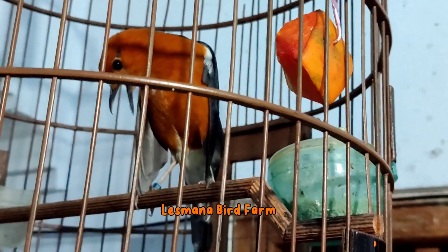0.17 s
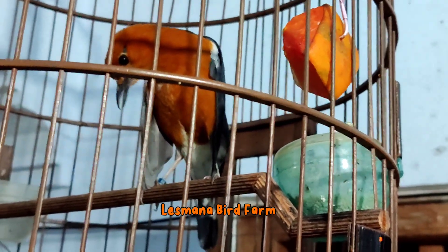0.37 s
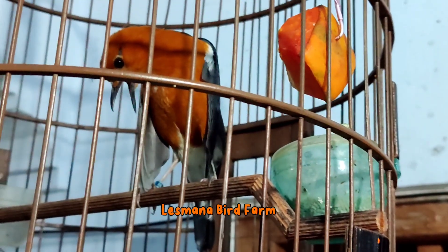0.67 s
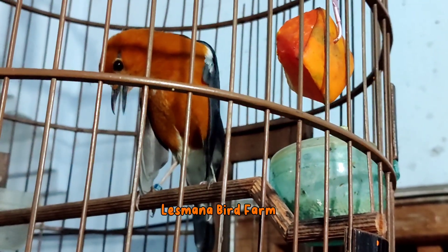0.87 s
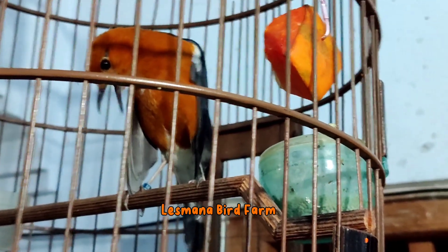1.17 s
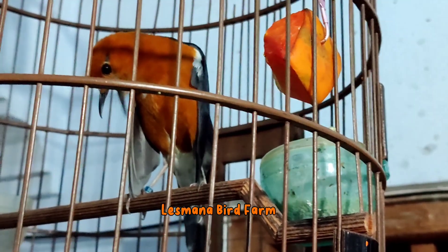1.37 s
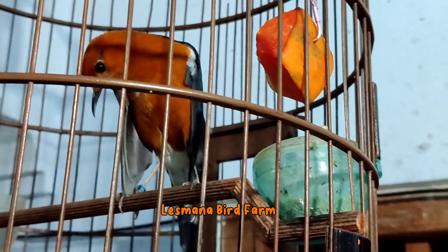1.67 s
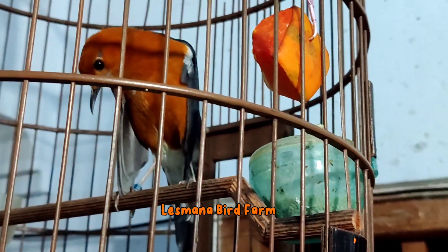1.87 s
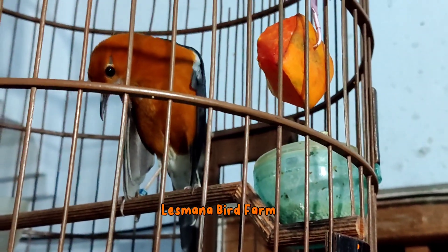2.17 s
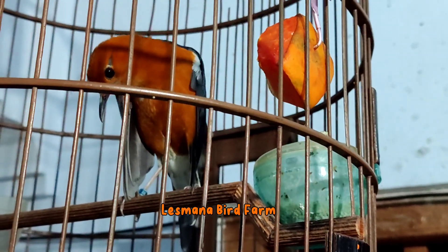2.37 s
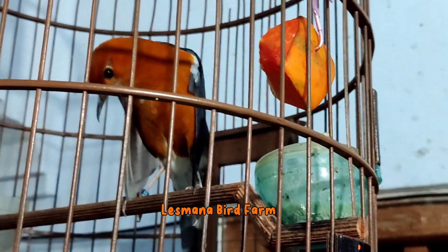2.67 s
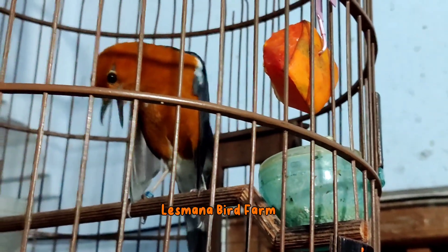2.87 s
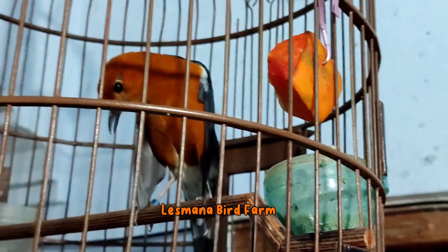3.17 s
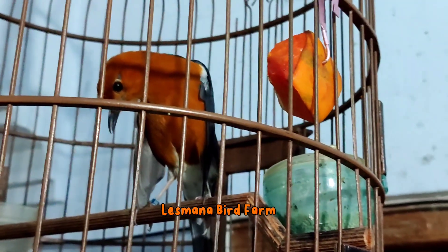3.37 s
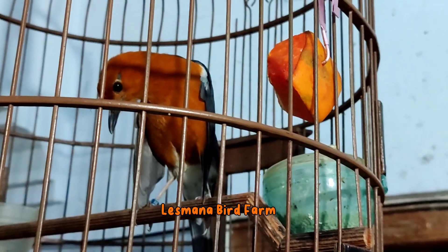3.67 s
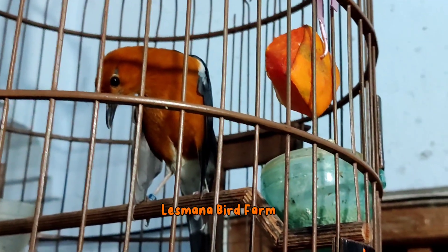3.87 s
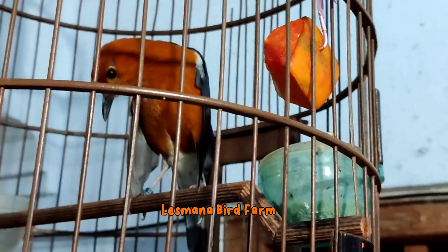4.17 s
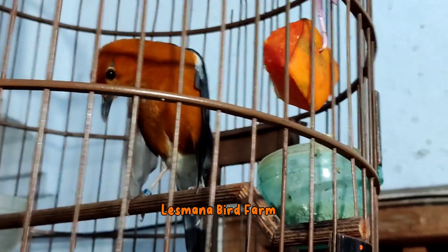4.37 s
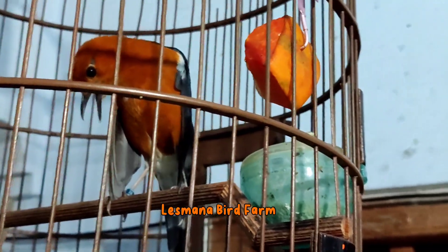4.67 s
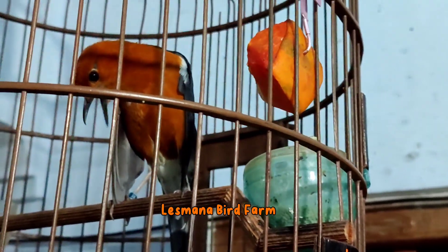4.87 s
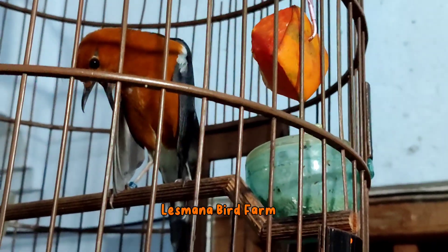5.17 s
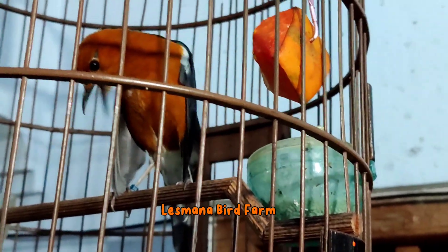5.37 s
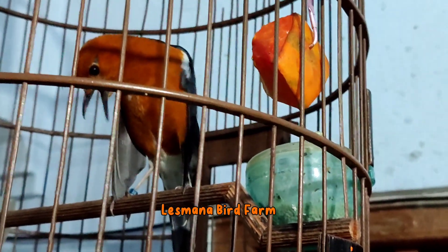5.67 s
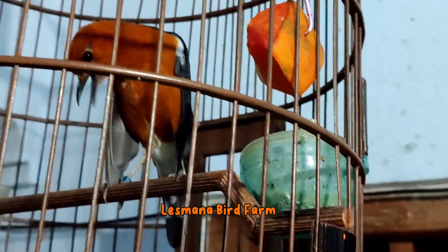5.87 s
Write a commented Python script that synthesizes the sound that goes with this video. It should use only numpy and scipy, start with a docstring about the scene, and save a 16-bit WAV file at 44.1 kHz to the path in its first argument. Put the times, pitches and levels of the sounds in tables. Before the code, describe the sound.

Very close caged songbird in a small hard-walled room, mostly on the right. Hoarse descending slurs lead to peeps and chirps that rise and plunge, then a fast warble, a very high sagging whistle and a swoop diving over an octave and back. Snappy chirps and a run of five ticks end the phrase. Quiet hum and air fill the gap before soft warbling, a nasal note, raspy slurs and bright peeps. Low overload thumps mark loud notes.

```python
"""A fading high ring over soft room air and a faint motor hum, then a caged thrush close to the microphones.
It sings raspy falling slurs, peeps, arched chirps, warbles, whistles, a swoop, sharp ticks and a nasal note.
Its syrinx is a gliding tone with harmonics, of which the throat favours one; hiss and trembling make the rasp.
The cage and the walls of the small room echo it as decaying noise; the right microphone thumps on loud notes."""
import sys
import numpy as np
from scipy import signal
from scipy.fft import rfft, irfft
from scipy.io import wavfile
from scipy.ndimage import uniform_filter1d

SR = 44100
rng = np.random.default_rng(int(sys.argv[2]) if len(sys.argv) > 2 else 0)


def log_audio(samples):
    """Write samples as a 16-bit WAV file to the path given in sys.argv[1]."""
    # one column per channel
    frames = np.atleast_2d(samples).T
    # limit to full scale, then quantise
    limited = np.clip(frames, -1, 1)
    pcm = np.round(limited * 32767).astype(np.int16)
    wavfile.write(sys.argv[1], SR, pcm)


N = 265702
TIME = np.arange(N) / SR


def from_db(db):
    """Amplitude factor of a level in dB."""
    return 10 ** (np.asarray(db) / 20)


def rms_one(x):
    """Scale a signal to rms 1."""
    return x / np.sqrt(np.mean(x ** 2) + 1e-20)


def at_hz(points, hz):
    """Read a curve of (Hz, value) points on a log-frequency axis."""
    points = np.array(points)
    return np.interp(np.log(np.maximum(hz, 1)), np.log(points[:, 0]), points[:, 1])


def band(x, low_hz, high_hz):
    """Causal band-pass."""
    edges_hz = [low_hz, min(high_hz, .45 * SR)]
    return signal.sosfilt(signal.butter(2, edges_hz, "band", fs=SR, output="sos"), x)


def resonate(x, hz, width_hz):
    """One resonance with gain 1 on top."""
    r = np.exp(-np.pi * width_hz / SR)
    zeros = np.array([1, 0, -1]) * (1 - r * r) / 2
    poles = [1, -2 * r * np.cos(2 * np.pi * hz / SR), r * r]
    return signal.lfilter(zeros, poles, x)


def panned(pan_db):
    """Left and right gains of mean power 1; pan_db is left minus right, so negative leans right."""
    gains = from_db(np.array([pan_db, -pan_db]) / 2)
    return gains / np.sqrt(np.mean(gains ** 2, axis=0))


def background(air_db=0, hum_db=-1, hum_width_hz=3):
    """Soft room noise, shaped in spectrum and stereo width, and the wavering lines of a motor."""
    # spectrum of the room air: hz, level_db (relative, per Hz)
    air_spectrum = [(20, -72), (35, -77), (80, -84.5), (170, -91), (270, -87), (450, -93), (900, -97),
                    (1800, -101), (3000, -105), (5000, -109), (7200, -108), (8500, -118), (13000, -115),
                    (16000, -117)]
    # lines of the motor: hz, level_db (relative to hum_db)
    hum_lines = [(168, -75.5), (247.6, -61), (285.3, -66.5), (323.0, -68), (355.3, -69.5)]
    # balance of the air: hz, left_minus_right_db
    air_balance = [(60, -0.5), (110, 4), (200, -1.5), (380, -5), (700, 1), (1290, -2), (2380, -1.5),
                   (4400, -6.0), (8120, -10), (15000, -8.5)]
    # correlation of the two channels: hz, likeness (values below 0 count as 0)
    air_likeness = [(60, 0.12), (180, 0.18), (550, 0.93), (1650, -0.1), (4970, -0.84), (15000, 0.01)]
    hz = np.arange(N // 2 + 1) * SR / N
    mid, side = rfft(rng.standard_normal((2, N)))
    alike = np.clip(at_hz(air_likeness, hz), 0, 1)
    pair = np.sqrt(1 + alike) * mid + np.sqrt(1 - alike) * side * [[1], [-1]]
    air = irfft(pair * from_db(at_hz(air_spectrum, hz)) * panned(at_hz(air_balance, hz)), N)
    hum = 0
    for line_hz, db in hum_lines:
        line = irfft(side * np.exp(-((hz - line_hz) / hum_width_hz) ** 2), N)
        hum = hum + from_db(db) * rms_one(line)
    return from_db(air_db) * np.sqrt(SR / 2) * air + from_db(hum_db) * hum


def lingering_note(pitch_hz=4950, width_hz=220, level_db=-34, overtones_db=-9, t60=0.52):
    """At first the room still rings with an earlier peep: narrow and broad noise dying away."""
    narrow = resonate(rng.standard_normal((2, N)), pitch_hz, width_hz)
    tone = rms_one(resonate(narrow, pitch_hz, 2 * width_hz))
    overtones = from_db(overtones_db) * rms_one(band(rng.standard_normal((2, N)), 4000, 11000))
    return (tone + overtones) * from_db(level_db - np.minimum(60 * TIME / t60, 200))


def span(start_s, length_s):
    """Sample times of one note, and its progress from 0 to 1."""
    t = np.arange(int(start_s * SR), int((start_s + length_s) * SR) + 2) / SR
    return t, np.linspace(0, 1, len(t))


def gesture(rows):
    """Sample times of a gesture and its columns, joined by lines with rounded corners."""
    s, *columns = np.transpose(rows)
    s = np.maximum.accumulate(s)
    t = np.arange(int(s[0] * SR), int(s[-1] * SR) + 2) / SR
    rounding = max(len(t) // 20, 1)
    return [t] + [uniform_filter1d(np.interp(t, s, c), rounding, mode="nearest") for c in columns]


def gate(t, attack_s, release_s):
    """The air valve opens and shuts."""
    return np.clip((t - t[0]) / attack_s, 0, 1) * np.clip((t[-1] - t) / release_s, 0, 1)


def swell(progress, crest, rise_db, fall_db):
    """Effort rounds up to a crest and sinks again; dB relative to the crest."""
    crest = np.clip(crest, .02, .98)
    before = rise_db * (1 - progress / crest) ** 2
    after = fall_db * ((progress - crest) / (1 - crest)) ** 2
    return -np.where(progress < crest, before, after)


def ending(t, length_s):
    """Grows ever faster from 0 to 1 over the last moments of a note; reversed, it shapes the attack."""
    return np.clip(1 - (t[-1] - t) / length_s, 0, 1) ** 2


def add(out, t, sound, pan_db):
    """Place a sound between the two channels."""
    start = round(t[0] * SR)
    out[:, start:start + len(t)] += (panned(pan_db).reshape(2, -1) * sound)[:, :max(N - start, 0)]


def syrinx(pitch, throat_hz, overtones_db, doubling, throat_octaves=0.32, rolloff_db=28, rolloff_ratio=2.68):
    """Harmonics of a gliding pitch: those near the throat resonance dominate, the others leak by the beak."""
    # how well the open beak radiates overtones: hz, level_db (relative)
    beak = [(1500, -25), (2200, -2.5), (2800, -3), (3400, 4), (4500, -5), (5700, 4.5), (7000, 4),
            (8900, -7), (10200, -3), (11500, 2.5), (13200, 4.5), (14500, -5), (16000, -7.5)]
    phase, out = 2 * np.pi * np.cumsum(pitch) / SR, 0
    for halves in range(1, 15):  # odd counts are the half-pitch lines of a doubled period
        hz = pitch * halves / 2
        octaves = np.log2(hz / throat_hz)
        rolloff = rolloff_db * np.maximum(octaves - np.log2(rolloff_ratio), 0)
        leak = from_db(overtones_db + at_hz(beak, hz) - rolloff)
        favoured = np.exp(-(octaves / throat_octaves) ** 2)
        gain = leak * doubling if halves % 2 else leak + (1 - leak) * favoured
        below_limit = np.clip((.45 * SR - hz) / 1000, 0, 1)  # keeps clear of aliasing
        out = out + gain * below_limit * np.sin(phase * halves / 2)
    return out


def flutter(t, rate_hz, width_hz):
    """Irregular trembling around one rate, with nothing much faster; rms 1 before trimming to the note."""
    steep = signal.butter(6, rate_hz + width_hz / 2, fs=SR, output="sos")
    trembling = resonate(rng.standard_normal(N // 10), rate_hz, width_hz)
    return rms_one(signal.sosfilt(steep, trembling))[-len(t):]


def turbulence(t, low_hz=5800, high_hz=15000):
    """Hiss of the air jet, band-passed twice for steep edges; rms 1 before trimming to the note."""
    once = band(rng.standard_normal(N // 10), low_hz, high_hz)
    return rms_one(band(once, low_hz, high_hz))[-len(t):]


def sing(t, pitch, level_db, overtones_db, pan_db, rasp=0, throat_ratio=1, doubling=0, rasp_depth=.04,
         rasp_throb=0.47, throb_above_hz=2000, hiss_db=-16, leak_db=-44, jitter=0.0047):
    """One stereo note with a little leaking air; rasp trembles the membranes in pitch and strength, and hisses."""
    tremble = rasp * flutter(t, rate_hz=450, width_hz=736)
    # jitter is the unsteadiness as a share of pitch
    bend = 1 + rasp_depth * tremble + jitter * flutter(t, rate_hz=120, width_hz=270)
    tone = syrinx(pitch * bend, pitch * throat_ratio, overtones_db, doubling)
    throb = rasp_throb * tremble * band(tone, throb_above_hz, 18000)
    hiss = from_db(hiss_db) * rasp * turbulence(t)
    leaking_air = from_db(leak_db) * turbulence(t, low_hz=1900, high_hz=11900)
    loudness = from_db(level_db) * gate(t, attack_s=0.0019, release_s=0.0014)
    out = np.zeros((2, N))
    add(out, t, (tone + throb + hiss + leaking_air) * loudness, pan_db)
    return out


def slurs(onset_db=17, release_db=10, end_rasp=.15, end_bright_db=3, rasp_power=0.85):
    """The pitch settles from above and droops, while the note grows louder and raspier; the octave leads."""
    # raspy slurs: start_s, length_s, first_hz, held_hz, settle_s, droop_hz, level_db (before the fades),
    # crescendo_db, rasp (0-1, before end_rasp), doubled_from_s, doubled_until_s
    slur_rows = [ (0.168, 0.22, 4093, 3193, 0.07, 496, -14, 9, 0.48, 0.2, 0.25),
                 (.567, 0.22, 4160, 3235, 0.064, 427, -16.5, 2.5, 0.6, 0.59, 0.64),
                 (5.115, 0.19, 3934, 3302, .035, 273.5, -10.5, 9.5, 0.82, 5.121, 5.147),
                 (5.463, 0.18, 4160, 3360, 0.026, 259, -10.5, 9, 0.53, 5.473, 5.44), ]
    attack_s, release_s, droop_s = 0.013, 0.033, .055
    overtones_db, throat_ratio, pan_db = -14, 2.04, -9
    # half-pitch lines relative to the overtones: while the syrinx doubles its period, and afterwards
    doubled_db, undoubled_db = 2, -15.5
    for (start, length, first_hz, held_hz, settle_s, droop_hz, db, crescendo_db, rasp,
         doubled_from, doubled_until) in slur_rows:
        t, progress = span(start, length)
        droop = ending(t, droop_s)
        settling = (first_hz - held_hz) * np.exp(-(t - t[0]) / settle_s)
        pitch = held_hz + settling - droop_hz * droop
        level_db = db - crescendo_db * (1 - progress)
        level_db = level_db - onset_db * ending(t, attack_s)[::-1] - release_db * ending(t, release_s)
        half_lines = from_db(np.where(t < doubled_until, doubled_db, undoubled_db))
        doubling = uniform_filter1d((t > doubled_from) * half_lines, size=200)
        yield sing(t, pitch, level_db, overtones_db + end_bright_db * droop, pan_db,
                   rasp * progress ** rasp_power + end_rasp * droop, throat_ratio, doubling,
                   rasp_depth=0.026, rasp_throb=0.61, throb_above_hz=5670, hiss_db=-16.0, leak_db=-49.5)


def echo_tail(t60_table, delay_s):
    """Dense stereo reflections that fade in up to delay_s and die away band by band, each scaled to unit energy."""
    t, out = TIME[:N // 10], 0
    white = rfft(rng.standard_normal((2, len(t))))
    hz = np.arange(white.shape[1]) * SR / len(t)
    edges = np.geomspace(1000, 18000, 13)
    for low, high in zip(edges, edges[1:]):
        t60 = at_hz(t60_table, np.sqrt(low * high))
        decay = from_db(-60 * t / t60) * np.clip(2 * t / delay_s - 1, 0, 1)
        noise = irfft(white * ((hz >= low) & (hz < high)), len(t))
        out = out + noise * decay / np.linalg.norm(decay)
    return out


def surroundings(song, cage_db=-9, cage_t60=0.047, room_db=-6, room_pan_db=-5):
    """The cage scatters the song within milliseconds, the walls a little later and for longer."""
    # reverberation of the room: hz, t60_s
    room_t60 = [(2000, 0.63), (4000, 0.39), (7000, 0.38), (11000, 0.24), (16000, .22)]
    cage = from_db(cage_db) * echo_tail([(2000, cage_t60), (16000, cage_t60)], delay_s=0.0085)
    room = from_db(room_db) * echo_tail(room_t60, delay_s=0.012) * panned(room_pan_db)[:, None]
    from_cage = signal.fftconvolve(song, cage, axes=1)
    from_walls = signal.fftconvolve(song.mean(0)[None], room, axes=1)
    return (from_cage + from_walls)[:, :N]


def peeps(droop_power=2.4, pan_db=-9):
    """Clear notes that nearly hold their pitch, then droop."""
    # clear peeps: start_s, length_s, pitch_hz, droop_hz, level_db (at the crest), overtones_db,
    # half_pitch_lines_db (relative to the overtones)
    peep_rows = [ (0.868, 0.037, 4900, 292, -26.5, -7, -26), (1.025, 0.053, 4680, 308, -15, -11, -24.5),
                 (5.787, 0.045, 5038, 454, -10.5, -13, -39), (5.909, 0.052, 4640, 303, -10.5, -15.5, -25.5),
                 ]
    for start, length, hz, droop_hz, db, overtones_db, doubling_db in peep_rows:
        t, progress = span(start, length)
        pitch = hz - droop_hz * progress ** droop_power
        level_db = db + swell(progress, crest=0.32, rise_db=9, fall_db=5)
        yield sing(t, pitch, level_db, overtones_db, pan_db, doubling=from_db(doubling_db))


def arches(early_rasp_share=0.32, doubling_db=-9, leak_db=-40, rasp_leak_db=24, fade_db=14, fall_power=1.15):
    """The pitch climbs or holds to a top as the note swells, then plunges, fades, roughens and doubles its period."""
    # arched chirps: start_s, rise_s, fall_s, first_hz, top_hz, last_hz, roundness of the rise (power),
    # level_db (at the top), fade_in_db, overtones_db, final_rasp (0-1), left_minus_right_db
    arch_rows = [ (1.156, .043, 0.03, 4290, 4330, 2920, 1.7, -13.5, 7.5, -8, 0.27, -4),
                 (1.278, 0.047, 0.043, 3600, 4170, 2700, 2.7, -13.5, 17, -7.5, 0.42, -6),
                 (1.423, .048, 0.034, 3686, 4127, 2556, 3.2, -13, 5.5, -10, 0.08, -4),
                 (1.576, 0.033, 0.01, 6300, 7090, 4660, 1.02, -7, 7.5, -15, 0.72, -10),
                 (2.546, 0.01, .020, 7070, 7065, 4204, 1.8, -5.5, 22, -8.5, 1, -12.5),
                 (2.654, 0.016, 0.026, 4490, 7140, 3770, 2, -7, 11, -9, 1, -11),
                 (2.794, .003, 0.0079, 4970, 6000, 5070, 2.5, -7, 9, -16.5, 0.8, -13.5), ]
    for (start, rise_s, fall_s, first_hz, top_hz, last_hz, roundness, db, fade_in_db,
         overtones_db, rasp, pan_db) in arch_rows:
        t, progress = span(start, rise_s + fall_s)
        to_climb = np.clip(1 - (t - start) / rise_s, 0, 1)
        fallen = np.clip((t - start - rise_s) / fall_s, 0, 1)
        climb = (top_hz - first_hz) * to_climb ** roundness
        plunge = (top_hz - last_hz) * fallen ** fall_power
        level_db = db - fade_in_db * to_climb ** 2 - fade_db * fallen
        rasp_now = rasp * np.maximum(early_rasp_share * progress, np.sqrt(fallen))
        yield sing(t, top_hz - climb - plunge, level_db, overtones_db, pan_db, rasp_now,
                   doubling=from_db(doubling_db) * rasp_now, leak_db=leak_db + rasp_leak_db * rasp_now)


def warbles(doubling_db=-24):
    """The pitch swings quickly about a slow glide."""
    # warbles: start_s, length_s, first_hz, last_hz (centre of the swing), rate_hz, depth (share of pitch),
    # level_db (at the crest), overtones_db, rasp (0-1), left_minus_right_db
    warble_rows = [ (1.719, 0.1, 5704, 6328, 74, .065, -9, -17.5, 0.1, -9),
                   (4.58, 0.12, 4250, 4187, 51, 0.058, -21, -10.5, 0.35, -8),
                   (4.751, .085, 3570, 3517, 48, 0.054, -24, -13.5, 0.17, -3.5), ]
    for start, length, first_hz, last_hz, rate, depth, db, overtones_db, rasp, pan_db in warble_rows:
        t, progress = span(start, length)
        glide = first_hz + (last_hz - first_hz) * progress
        pitch = glide * (1 + depth * np.cos(2 * np.pi * rate * (t - t[0])))
        level_db = db + swell(progress, crest=0.15, rise_db=12.5, fall_db=7)
        yield sing(t, pitch, level_db, overtones_db, pan_db, rasp, doubling=from_db(doubling_db))


def whistles(onset_rasp=.35, leak_db=-50, onset_leak_db=32, settle_s=0.013):
    """The pitch drops fast onto its line, hoarse at first, and then sags slowly."""
    # whistles: start_s, length_s, pitch_hz, overshoot_hz, sag_hz_per_s, level_db (at the crest),
    # overtones_db, rasp (0-1, once settled), left_minus_right_db
    whistle_rows = [ (1.925, .141, 8046, 1100, 4490, -8, -13, 0, -8),
                    (4.601, .088, 4403, 711, 615, -16, -19, 0, -10), ]
    for start, length, hz, overshoot_hz, sag_hz_per_s, db, overtones_db, rasp, pan_db in whistle_rows:
        t, progress = span(start, length)
        unsettled = np.exp(-(t - t[0]) / settle_s)
        pitch = hz + overshoot_hz * unsettled - sag_hz_per_s * (t - t[0])
        level_db = db + swell(progress, crest=0.31, rise_db=17.5, fall_db=6)
        yield sing(t, pitch, level_db, overtones_db, pan_db, rasp + onset_rasp * unsettled,
                   leak_db=leak_db + onset_leak_db * np.sqrt(unsettled))


def swoop():
    """A nearly clean whistle dives by more than an octave and climbs back, hoarse in places."""
    # path of the swoop: time_s, pitch_hz, level_db, overtones_db, rasp (0-1)
    swoop_path = [(2.186, 7280, -14.5, -15.5, 0.07), (2.22, 6620, -7.5, -18.5, 0),
                  (2.26, 6243, -11.5, -15, 0), (2.313, 5700, -13.5, -16.5, 0.18),
                  (2.333, 3350, -23, -11.5, 0.4), (2.355, 2920, -19.5, -21, .06),
                  (2.39, 2890, -15.5, -25.5, .1), (2.42, 4290, -14, -31, .6), (2.475, 5130, -22, -18, 0),
                  (2.512, 5100, -28.5, -17, 0.9)]
    # it leans right when high and is almost centred when low: pitch_hz, left_minus_right_db
    swoop_pan = [(3000, -1), (5000, -9.5)]
    t, pitch, level_db, overtones_db, rasp = gesture(swoop_path)
    return sing(t, pitch, level_db, overtones_db, at_hz(swoop_pan, pitch), rasp, rasp_depth=.045,
                rasp_throb=.5, throb_above_hz=4400, hiss_db=-20, leak_db=-46)


def pips(overtones_db=-20, pan_db=-9):
    """Tiny upward flicks that lead into a chirp or a tick."""
    # rising pips: start_s, length_s, first_hz, last_hz, level_db (at the crest)
    pip_rows = [(2.527, 0.011, 4250, 6930, -15), (2.767, 0.0092, 5200, 7740, -11.5),
                (2.8555, 0.0044, 6700, 7840, -11), (2.938, 0.0068, 6900, 7600, -20)]
    for start, length, first_hz, last_hz, db in pip_rows:
        t, progress = span(start, length)
        pitch = last_hz - (last_hz - first_hz) * (1 - progress) ** 2
        level_db = db + swell(progress, crest=.5, rise_db=5.5, fall_db=12)
        yield sing(t, pitch, level_db, overtones_db, pan_db)


def ticks(rasp_depth=0.022, hiss_db=-19, throat_hz=6280, overtones_db=-19.5, pan_db=-7.5):
    """The pitch plunges through a fixed throat resonance: the fundamental flashes first, then the octave."""
    # ticks: start_s, level_db (added to that of the dip)
    tick_rows = [(2.7857, -8.5), (2.8686, -6.5), (2.951, -7), (3.0388, -9.5), (3.130, -8.5)]
    # one tick is a very fast dip in pitch: time_ms, pitch_hz, level_db (relative)
    tick_dip = [(0, 7000, -13.5), (.8, 5900, 3), (1.7, 4200, 7), (3.2, 4000, -9), (6, 3740, 2),
                (9, 3900, -7.5), (12, 4400, -1.5), (15, 6300, -9)]
    out = np.zeros((2, N))
    for start, tick_db in tick_rows:
        t, pitch, level_db = gesture([(start + ms / 1000, hz, db) for ms, hz, db in tick_dip])
        bend = 1 + rasp_depth * flutter(t, rate_hz=870, width_hz=1860)
        voice = syrinx(pitch * bend, throat_hz, overtones_db, doubling=0)
        voice = voice + from_db(hiss_db) * turbulence(t)
        loudness = from_db(tick_db + level_db) * gate(t, attack_s=.0004, release_s=0.0013)
        add(out, t, voice * loudness, pan_db)
    return out


def nasal_note(first_overtones_db=-5, last_overtones_db=-15, throat_ratio=1.9, pan_db=-9.0, onset_db=13):
    """A low note rich in overtones gathers into its octave as it swells, and turns up roughly at its end."""
    start_s, length_s, pitch_hz, crest_db = 4.909, .13, 2159, -15
    attack_s, upturn_s, upturn_hz = 0.022, .05, 475
    rasp, upturn_rasp = .22, .6
    t, progress = span(start_s, length_s)
    upturn = ending(t, upturn_s)
    level_db = crest_db + swell(progress, crest=0.9, rise_db=20, fall_db=15)
    level_db = level_db - onset_db * ending(t, attack_s)[::-1]
    overtones_db = first_overtones_db + (last_overtones_db - first_overtones_db) * progress
    return sing(t, pitch_hz + upturn_hz * upturn, level_db, overtones_db, pan_db, rasp + upturn_rasp * upturn,
                throat_ratio, rasp_depth=0.028, rasp_throb=0.37, throb_above_hz=1600, hiss_db=-22, leak_db=-40)


def scene():
    """The direct song reaches the right side a quarter of a millisecond late and inverted; the room joins in."""
    song = sum(sum(kind()) for kind in (slurs, peeps, arches, warbles, whistles, pips))
    song = song + swoop() + nasal_note() + ticks()
    late_right = np.interp(TIME - .000238, TIME, song[1])
    direct = np.array([song[0], -late_right])
    return direct + surroundings(song) + lingering_note() + background()


def record(dry, sore_hz=8000, sore_width_hz=600, thump_db=6, broad_db=-7, crackle=1.0, crackle_hz=1400,
           cutoff_hz=16100):
    """The right microphone rectifies loud sound into gritty thumps, most near sore_hz; both lose their top."""
    sore = resonate(resonate(dry[1], sore_hz, sore_width_hz), sore_hz, sore_width_hz)
    pressure = from_db(thump_db) * sore ** 2 + from_db(broad_db) * dry[1] ** 2
    grit = 1 + crackle * rms_one(band(rng.standard_normal(N), 40, crackle_hz))
    thump_band = signal.butter(1, [4, 30], "band", fs=SR, output="sos")
    thump = signal.sosfilt(thump_band, pressure * grit)
    top_cut = signal.ellip(12, .1, 90, cutoff_hz, fs=SR, output="sos")
    return signal.sosfilt(top_cut, dry - thump * [[0], [1]])


dry = scene()
out = record(dry)
log_audio(out)
```